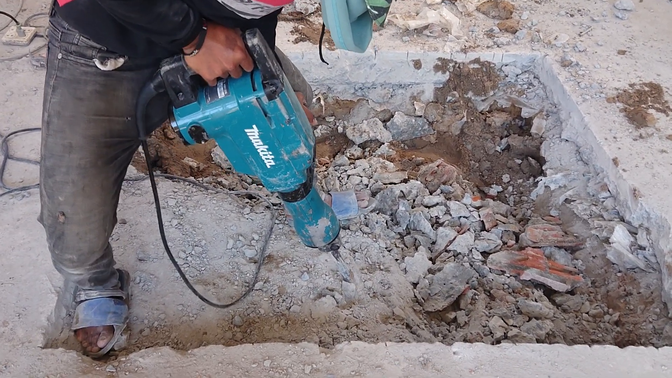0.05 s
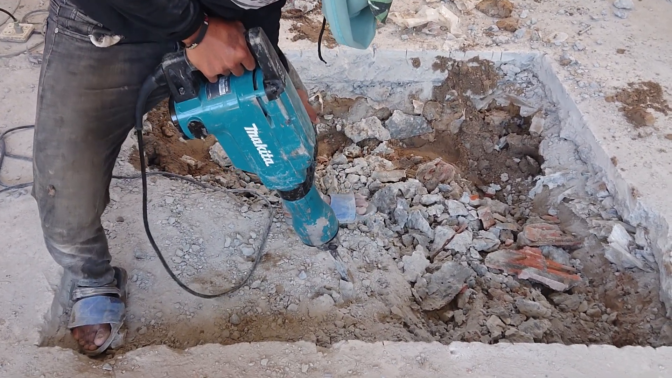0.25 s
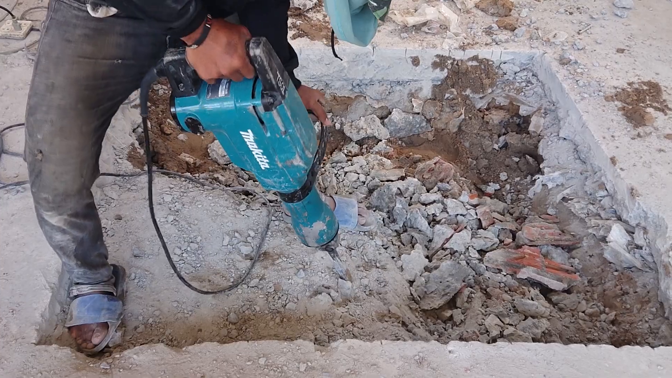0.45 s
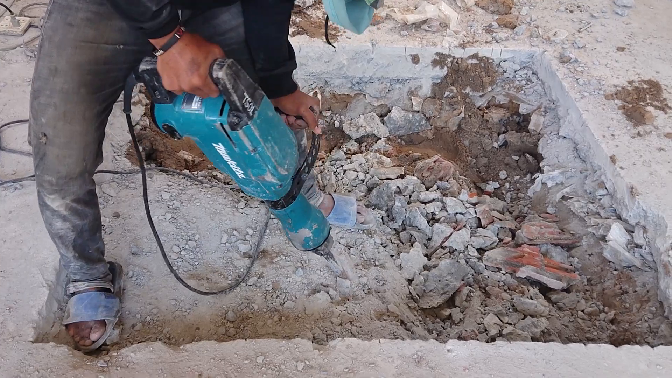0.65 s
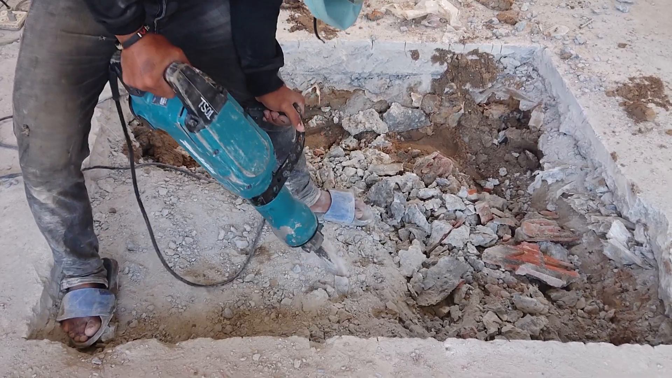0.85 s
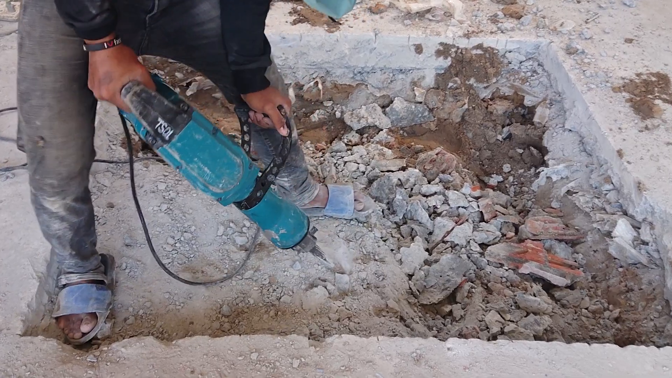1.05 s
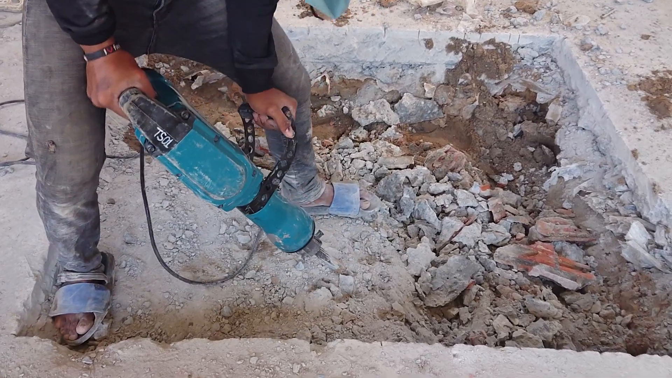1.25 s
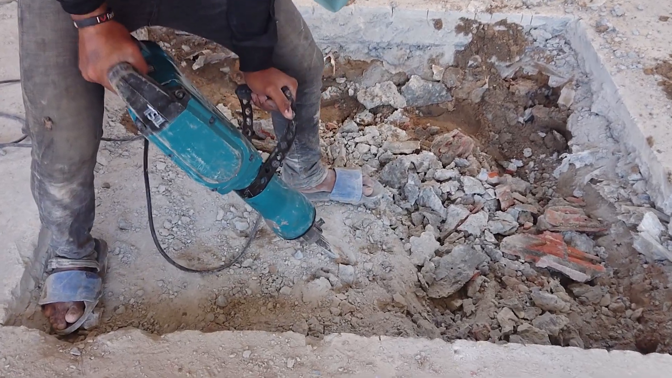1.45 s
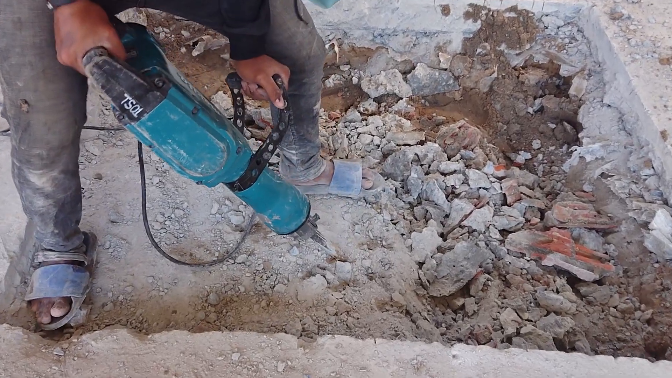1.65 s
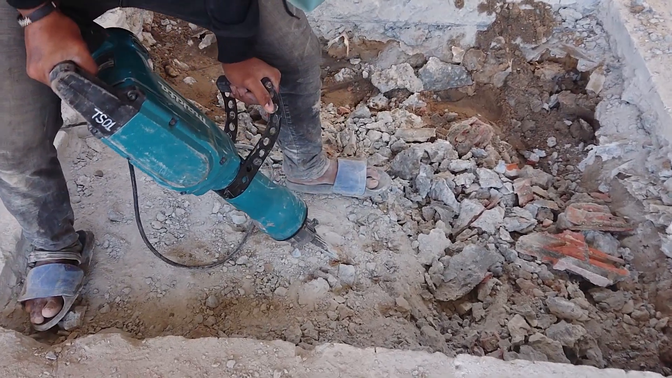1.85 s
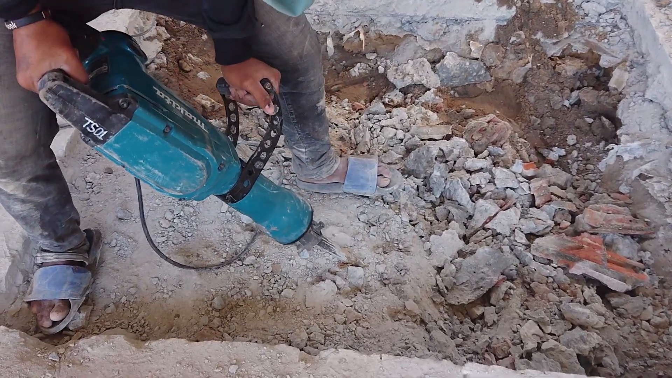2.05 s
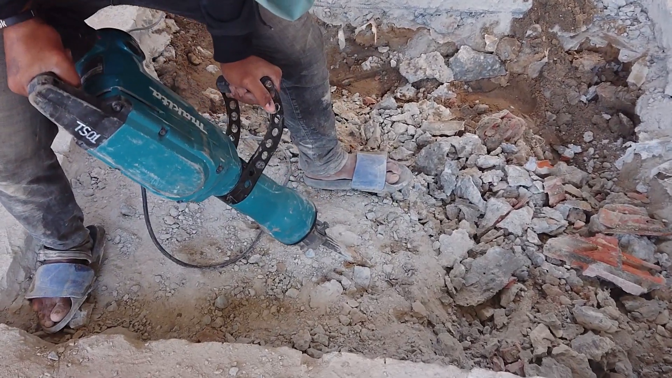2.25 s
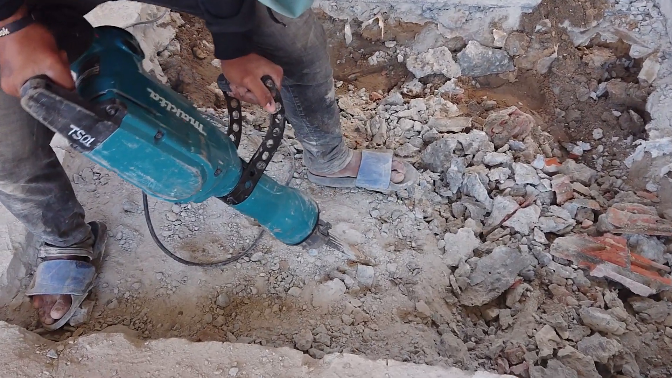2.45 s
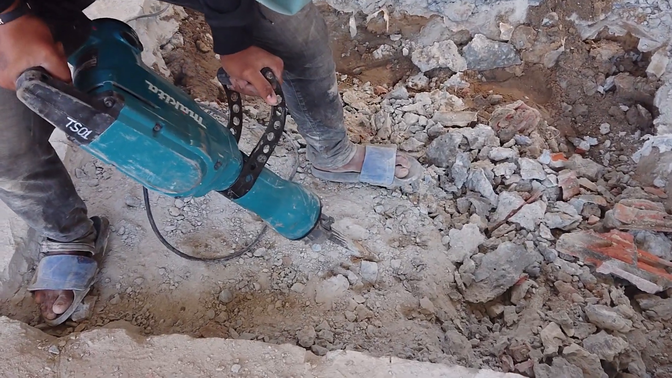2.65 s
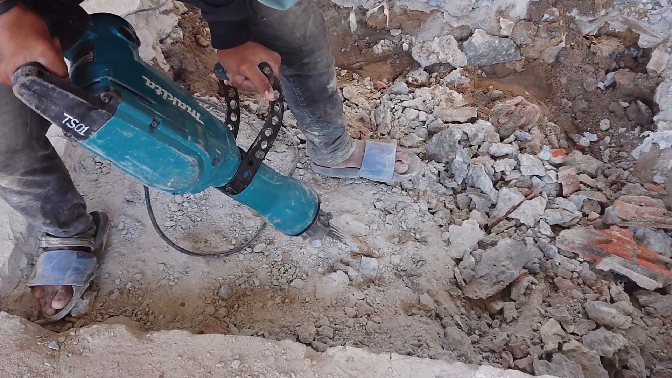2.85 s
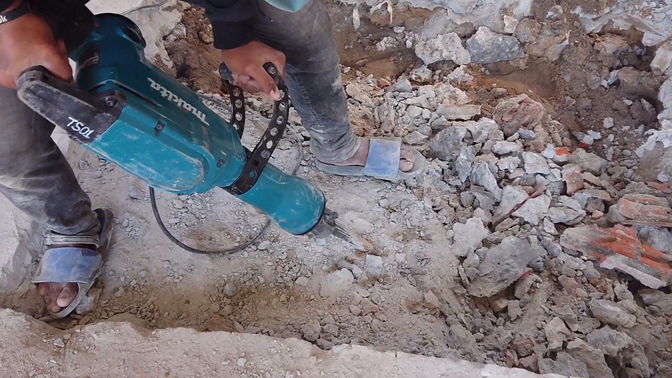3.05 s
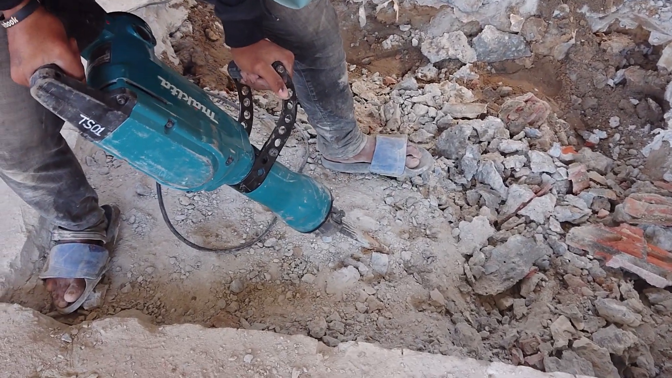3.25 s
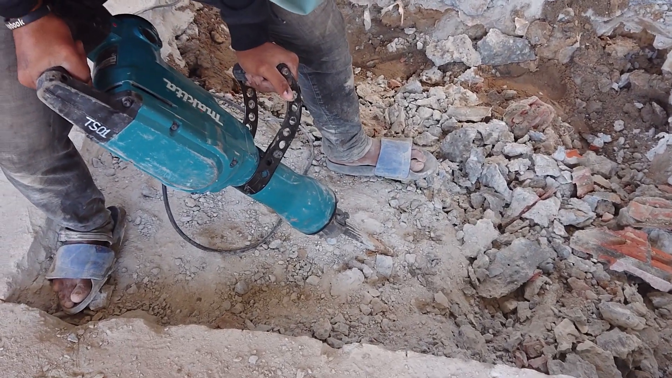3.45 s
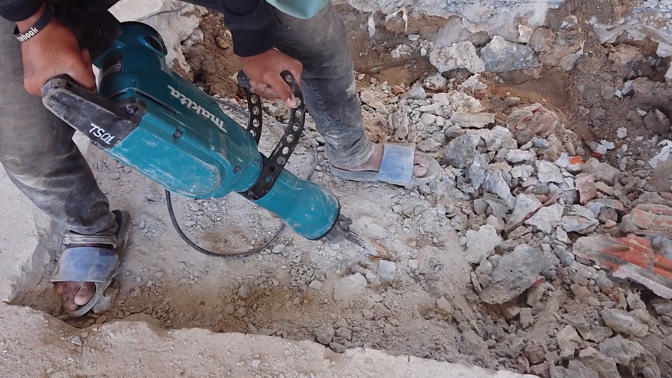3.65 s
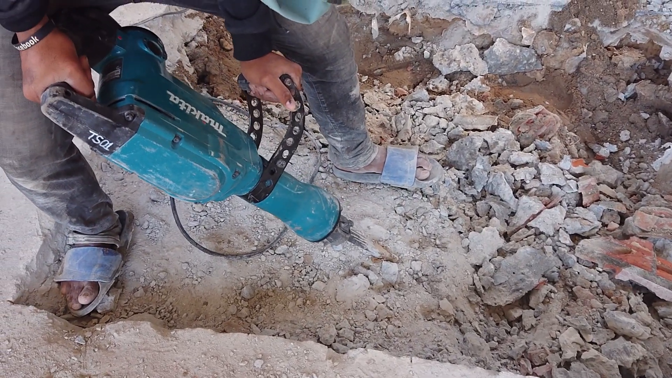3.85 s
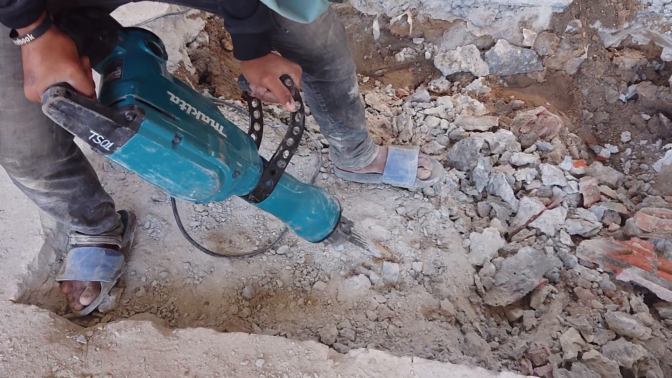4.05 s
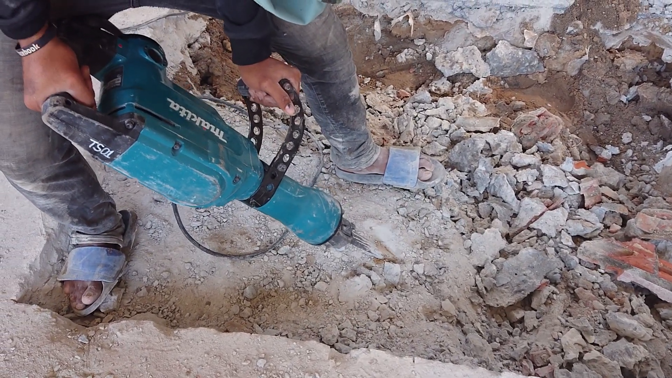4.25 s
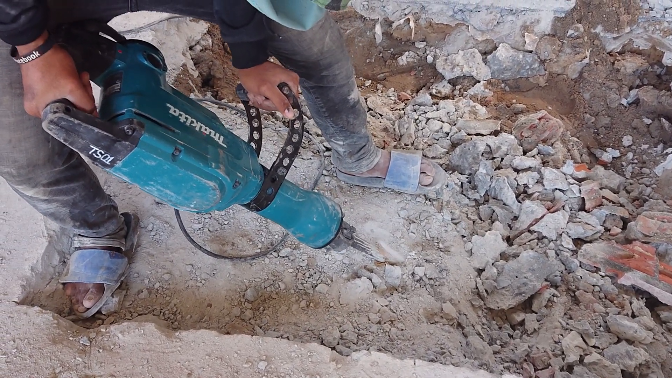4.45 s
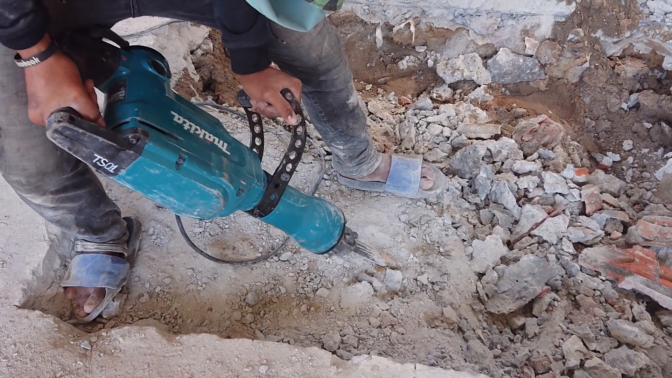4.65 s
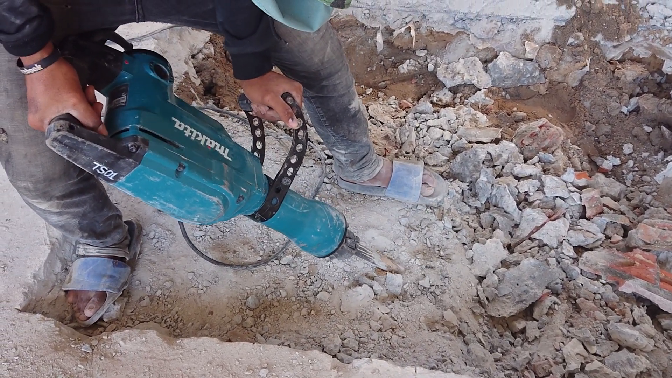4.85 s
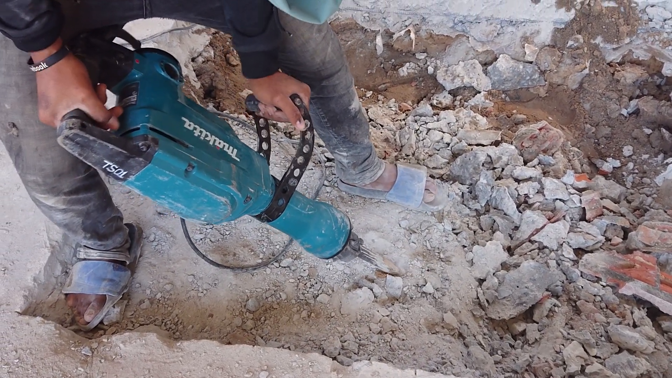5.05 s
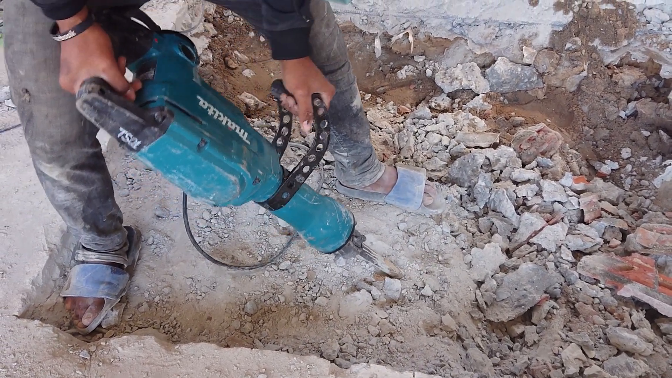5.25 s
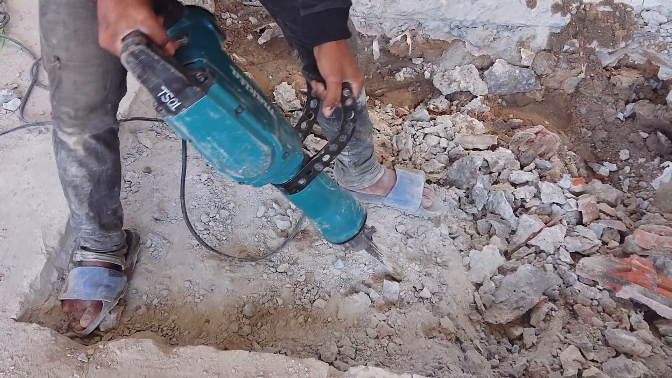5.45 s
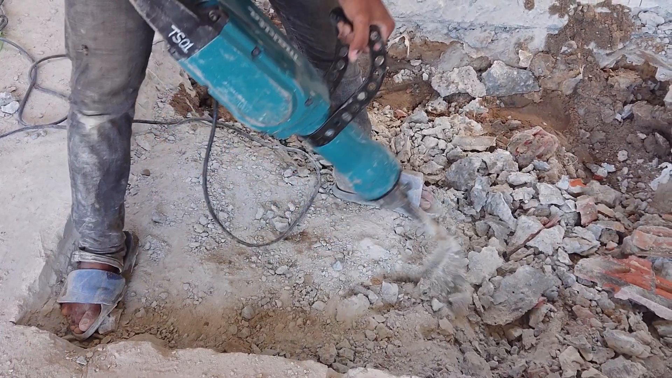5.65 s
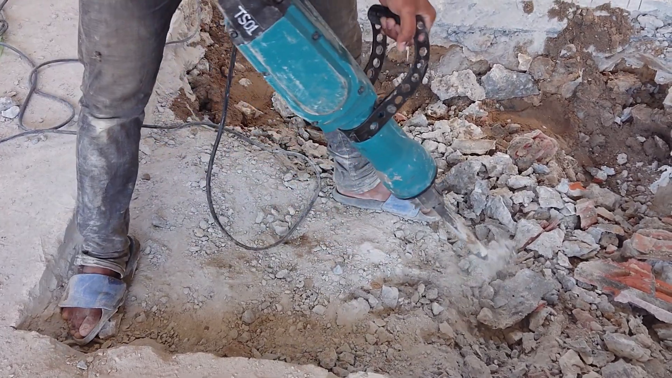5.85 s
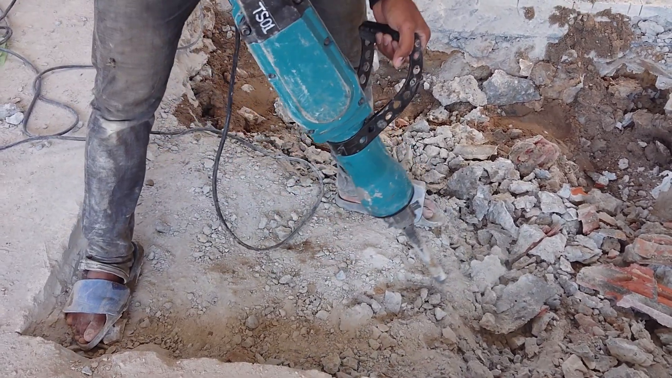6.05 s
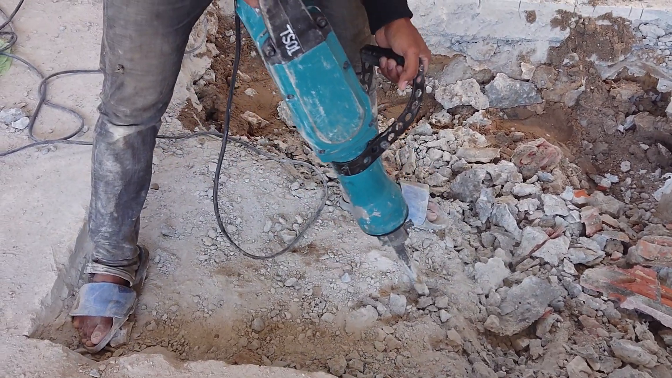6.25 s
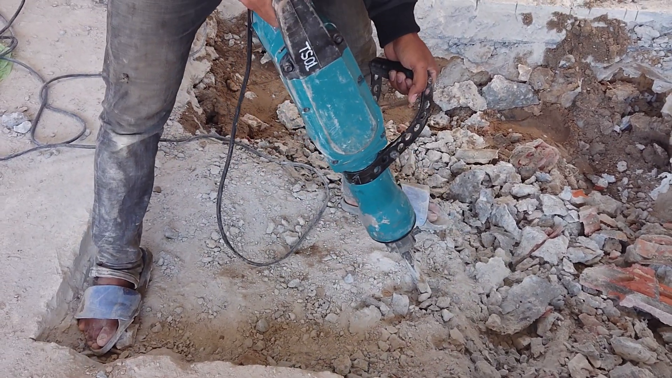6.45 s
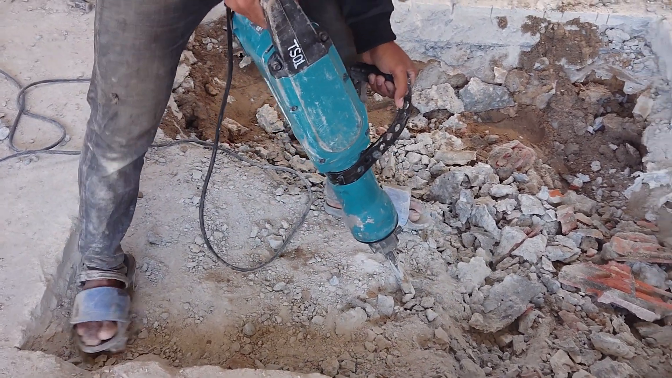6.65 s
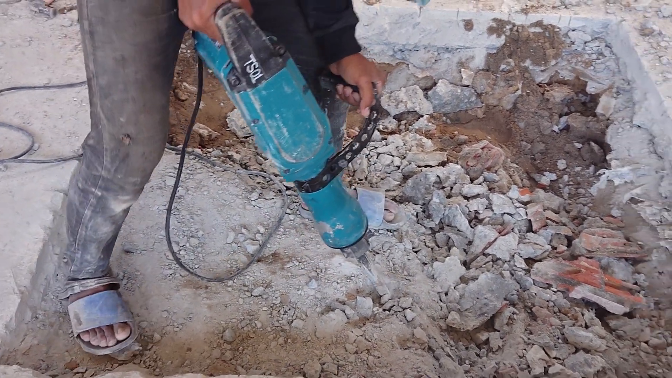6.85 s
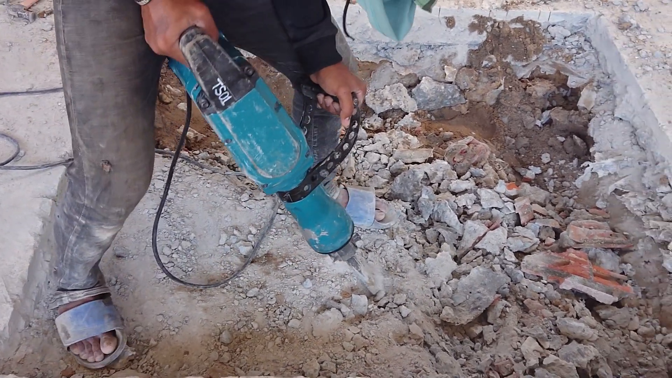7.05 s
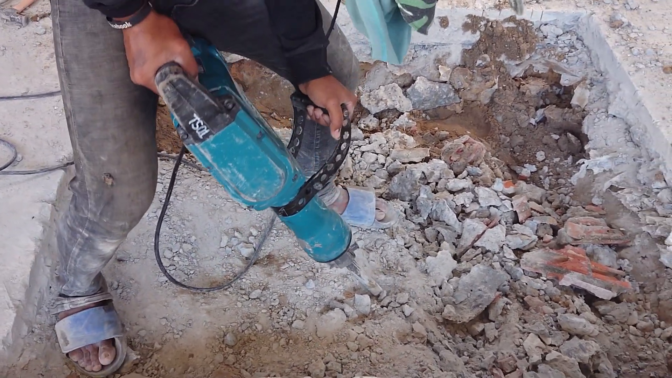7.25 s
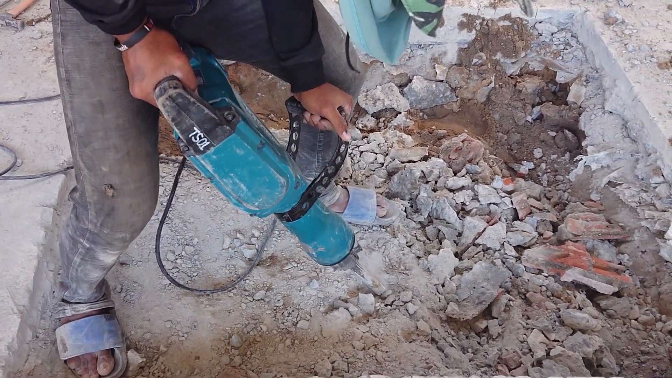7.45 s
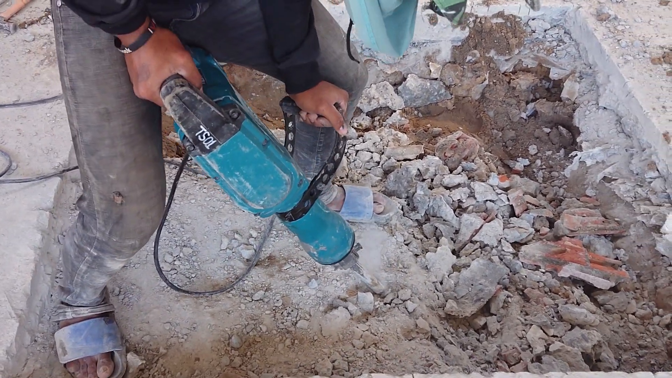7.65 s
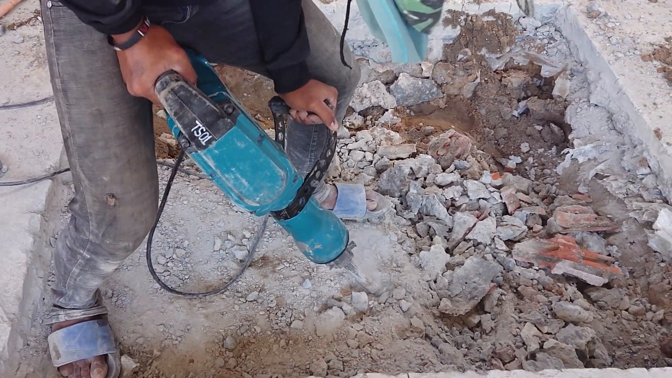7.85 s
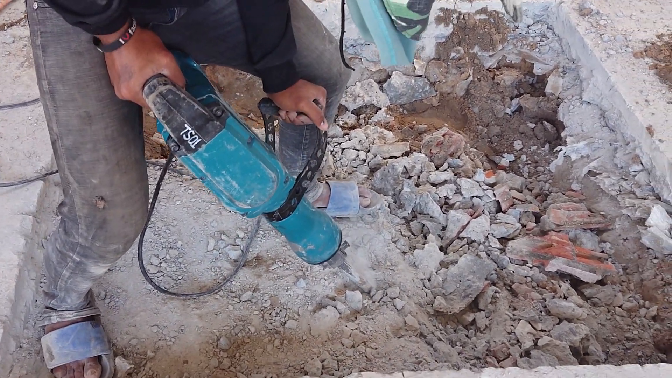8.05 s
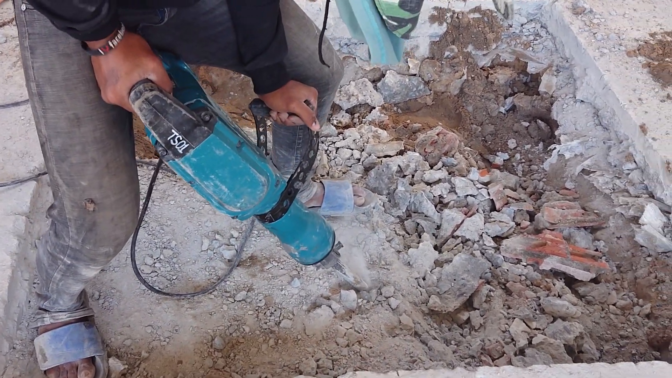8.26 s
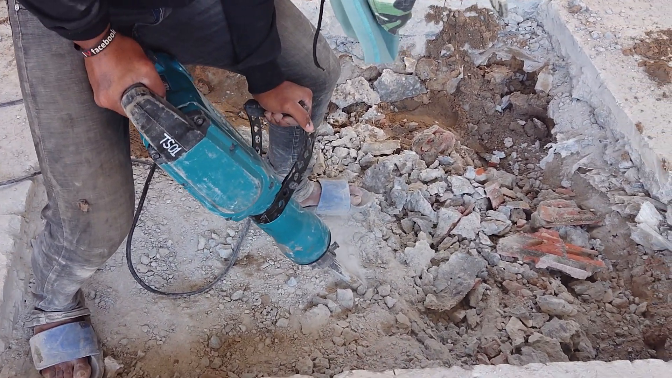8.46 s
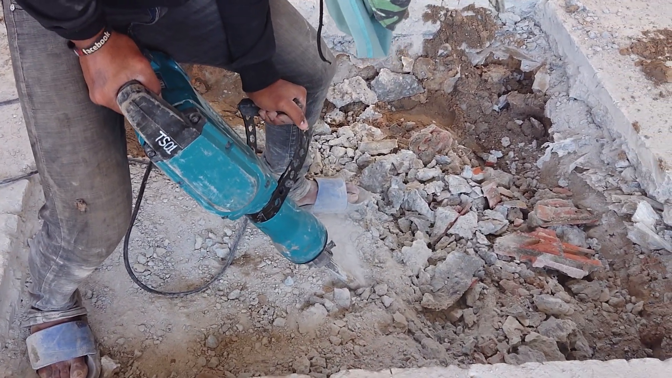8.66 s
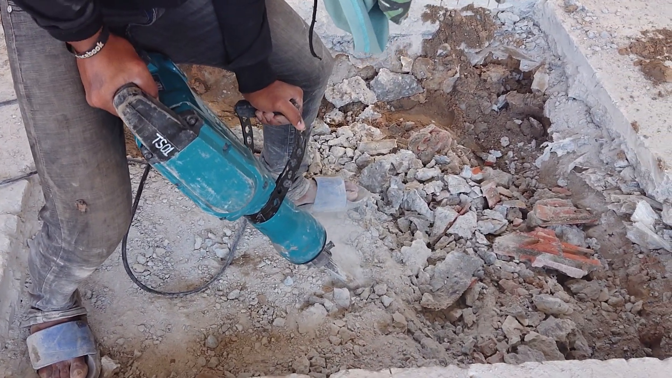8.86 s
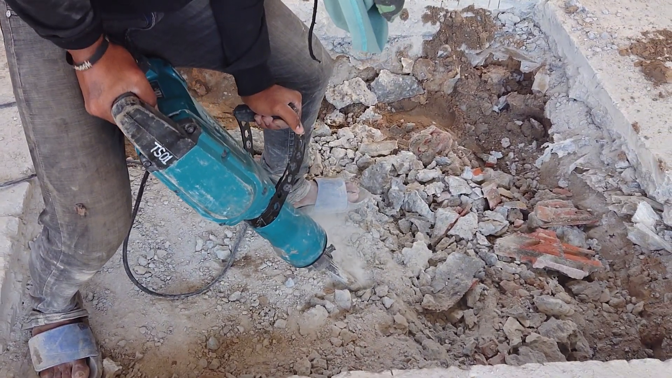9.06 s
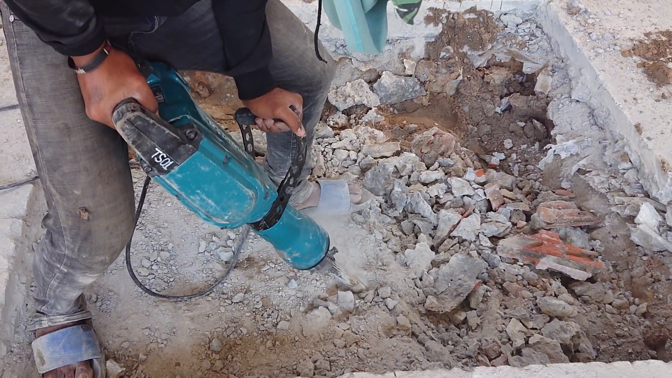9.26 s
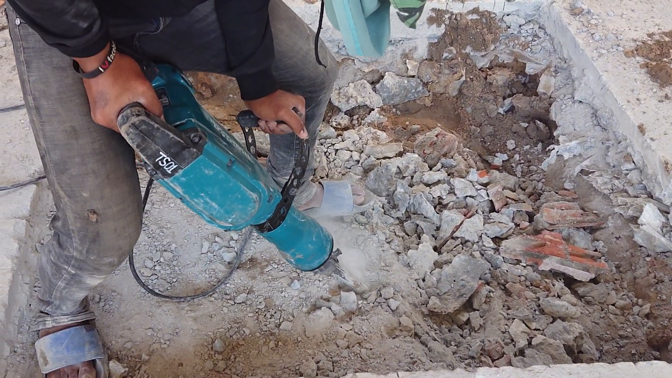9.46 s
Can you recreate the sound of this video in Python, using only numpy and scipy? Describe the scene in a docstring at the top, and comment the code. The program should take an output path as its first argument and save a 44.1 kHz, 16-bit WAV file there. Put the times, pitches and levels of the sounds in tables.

```python
"""An electric demolition hammer breaks concrete outdoors, close to a handheld pair of microphone ports.
About 22 blows a second: each is a noise crack, a damped slab knock, a clack and a ringing chisel.
Between blows, shaped noise makes gears and loose steel rattle; sines at crank multiples shake the casing.
The trigger is let go once: the blows slow down, steel clinks, then the motor growls up again."""
import sys
import numpy as np
from scipy import signal
from scipy.fft import rfft, irfft, next_fast_len
from scipy.io import wavfile
from scipy.ndimage import uniform_filter1d, map_coordinates

SR = 44100
rng = np.random.default_rng(int(sys.argv[2]) if len(sys.argv) > 2 else 0)


def store_pcm(level_fs):
    """Save levels as 16-bit WAV."""
    pcm = np.round(np.clip(level_fs, -1, 1) * 32767).astype(np.int16)
    wavfile.write(sys.argv[1], SR, np.atleast_2d(pcm).T)


N = 418950
T = np.arange(N) / SR  # s

# All levels are relative: each layer has further gains of its own.
# Place and microphone: likeness of the two ports [f/Hz, likeness 0 to 1]
PORT_LIKENESS = [(50, .8), (150, .9), (400, .85), (900, .7), (1800, .5), (5000, .5), (9000, .25)]
# Phase by which the left port leads [f/Hz, phase/rad]
LEFT_LEAD = [(0, 0), (1030, 0.5), (1980, 4.5), (2580, 6.5), (3700, 9.5), (4910, 13.5), (5680, 19),
             (7240, 25), (16000, 36.5)]
# Left port minus right port [f/Hz, level/dB]
LEFT_TILT = [(60, 1.5), (700, -2), (1300, -6), (2400, -3.5), (5000, -4), (9000, -4), (15000, 1)]
TOP_HZ = 16000  # band limit
PATCHY_DB = 2  # rms spread of the patches of gain in every hiss

# Casing: low drone that comes and goes [t/s, level/dB]
DRONE_LEVEL = [(4.55, -60), (4.6, -28), (4.68, -27), (4.73, -62), (4.8, -30), (4.95, -37), (5.05, -43),
               (5.2, -36), (5.43, -37), (5.7, -48), (6.0, -41), (6.15, -49), (6.22, -48)]
DRONE_HZ = 65.7
# Casing shake [multiple of the crank speed, level/dB]
SHAKE_ORDERS = [(1, -29), (2, -14), (3, -4), (4, -8), (5, -13), (6, -6), (7, -10), (8, 0), (9, -9),
                (10, -7), (11, -8), (12, -4), (13, -4), (14, -15), (15, -4), (16, -9), (17, -14)]
# Growl under the shake [f/Hz, level/dB per Hz]
GROWL_SPECTRUM = [(18, -62), (30, -52), (48, -7), (69, -7.5), (171, -3.5), (402, -9), (600, -8), (780, -18),
                  (1320, -120)]

# Running noise of the tool [t/s, gear level/dB, rattle level/dB, casing thrum level/dB]
TOOL_LEVELS = [(0, -23.5, -18.5, -34.5), (1, -20.5, -21, -30.5), (1.3, -23, -20, -34),
               (2.2, -21.5, -24, -34), (3.2, -21.5, -25.5, -33), (4.4, -20.5, -22, -31.5),
               (4.7, -22, -21.5, -38), (5.1, -25.5, -22.5, -34.5), (5.7, -39, -40.5, -43.5),
               (6.04, -48, -49.5, -48.5), (6.15, -39.5, -39.5, -46.5), (6.42, -49, -55.5, -48),
               (6.47, -37.5, -47, -44), (6.586, -52, -54, -50), (6.59, -35, -49, -26),
               (6.73, -29, -46, -34), (6.78, -25.5, -27, -33), (7, -23, -19, -33),
               (7.2, -27.5, -23.5, -36.5), (7.5, -25.5, -19.5, -35), (9.5, -24.5, -19.5, -33.5)]
# Gearbox resonances [f/Hz, level/dB per Hz]
GEAR_SPECTRUM = [(300, -21.5), (680, 0), (1100, -5), (1750, -0.5), (2020, -2), (2180, -3), (2420, -3),
                 (2690, -6), (2950, -6.5), (4000, -6.5), (6000, -84)]
# Narrow resonances of the gear housing [f/Hz, width/Hz, level/dB]
HOUSING_MODES = [(2180, 164, 0), (2664, 110, -1.5)]
# How much the housing rings over the gear noise [t/s, level/dB]
HOUSING_RING = [(0, -10), (1.7, -11), (2.2, -1.5), (4.5, -3.5), (5.9, -1), (6.2, -12.5), (7, -6),
                (9.5, -11)]
# Treble of struck steel, with two narrow peaks [f/Hz, level/dB per Hz]
SIZZLE_SPECTRUM = [(4600, -22), (7800, -8), (8300, -22), (8930, -46), (9400, -3), (12300, 0), (12590, 7),
                   (12900, 0), (14800, -5), (15350, -3), (15500, 9), (15650, -6), (16000, -14)]
SIZZLE_DB = -9  # treble of the rattle under its body

# Loose chisel and switch [t/s, contact level/dB, knock level/dB, ring level/dB], the last two re contact
CLINK_EVENTS = [(5.6, -19, -3, -15), (5.662, -23, -18, -17), (5.828, -19, -10, -23), (6.065, -23, -18, -11),
                (6.128, -20.5, -10, -15), (6.191, -36, -18, -6), (6.476, -38, -12, -23),
                (6.502, -33, 1, -25), (6.591, -41, 0, -25), (6.739, -15.5, -18, -30)]
# Modes of the chisel hanging free [f/Hz, level/dB, t60/s]
FREE_CHISEL = [(2230, -5, 0.37), (3300, -6.5, 0.33), (4600, -5, 0.36), (5240, 1, 0.63), (5720, -10, .3),
               (6000, -7, .3), (6470, -14, .2), (6860, -6, .35), (7770, -18, .3)]

# Crank, one blow a turn: hurries when the chisel slips, coasts, spins up again [t/s, turns made]
CRANK_TURNS = [(.006, 0), (.577, 13), (.983, 22), (1.122, 25), (1.255, 28), (1.416, 32), (1.545, 35),
               (1.901, 43), (2.52, 57), (3.134, 71), (3.663, 83), (4.112, 93), (4.344, 98), (5.071, 114),
               (5.125, 115), (5.185, 116), (5.26, 117), (5.347, 118), (5.455, 119), (6.786, 120),
               (6.854, 121), (6.905, 122), (7.003, 124), (7.457, 134), (7.946, 145), (8.249, 152),
               (9.47, 180)]
PACE = 22.7  # reference crank speed, turns/s
FLIGHT_S = .0012  # the piston lands this long after the crank comes round
JITTER_S = .0008  # rms scatter of the landing
CRACK_DB, CRACK_SCATTER_DB, KNOCK_SCATTER_DB = -9.5, 1.94, 1  # an ordinary blow and its rms scatter
# Blows that land harder or glance off [t/s, crack level/dB, slab knock level/dB]
UNUSUAL_BLOWS = [(.049, -17, -21.7), (.094, -12, -9.5), (.225, -9, -7), (.313, -8, -4), (.359, -14, -11.5),
                 (.401, -21, -5), (.533, -17, -6.5), (.577, -15, -10.5), (.622, -11.5, -7.5),
                 (.711, -9.5, -10), (1.027, -9, -13), (1.075, -9, -12), (1.166, -29, -33),
                 (1.212, -19, -20), (1.255, -13, -16), (1.295, -17, -14), (1.375, -8.5, -25),
                 (1.812, -6, -24), (1.856, -12, -14), (1.901, -7.5, -11.5), (2.52, -6, -10),
                 (2.567, -11, -12), (2.829, -14, -16), (2.957, -6.5, -28), (3.051, -12.5, -17),
                 (3.404, -11, -11), (3.753, -9.5, -6.5), (3.934, -12.5, -10.5), (4.112, -8.5, -7.5),
                 (4.249, -6.6, -12), (4.344, -4, -13), (4.435, -12, -8), (4.707, -12, -8.5),
                 (4.799, -11.5, -8), (4.843, -6, -13), (5.26, -10.5, -7), (5.347, -12, -18),
                 (5.455, -16, -17.5), (6.788, -10.5, -16.5), (6.854, -7.5, -14.5), (6.955, -10, -26),
                 (7.003, -12, -16), (7.047, -6.7, -10.5), (7.185, -30, -25), (7.231, -15, -22),
                 (7.277, -15, -25), (7.322, -10.5, -18), (7.366, -7, -13), (7.457, -8.5, -11),
                 (7.549, -8.5, -20), (7.636, -17, -16), (7.68, -7.5, -21), (7.946, -8, -20),
                 (8.076, -7, -14), (8.163, -7.5, -13.5), (8.249, -6, -21), (8.6, -11.5, -30),
                 (8.686, -9, -17), (8.816, -6.5, -14), (8.992, -11, -23), (9.338, -6.5, -19),
                 (9.47, -14, -16)]
# How the chisel sits in the slab
# [t/s, ring level/dB, knock level/dB, knock f/Hz, barrel clack level/dB, clack f/Hz]
CHISEL_SEAT = [(0, -32.5, -10.5, 790, -9, 4280), (.8, -26.5, -12.5, 845, -26, 3820),
               (1.27, -34, -21, 745, -13, 3140), (1.6, -24.5, -21, 950, -14, 3050),
               (2.0, -47, -11.5, 1097, -9, 2964), (4.1, -47, -12, 1110, -11.5, 3004),
               (4.45, -31, -11, 1100, -19, 3030), (4.6, -28.5, -9.5, 800, -22, 3170),
               (5.13, -31, -12, 780, -31, 3480), (5.26, -33, -16, 1070, -27, 3600),
               (5.46, -38.5, -14, 1070, -34, 4000), (6.8, -34, -19.5, 736, -1, 3175),
               (7.6, -37, -17, 774, -9.5, 4050), (9.5, -28.5, -19, 780, -5.5, 4090)]
# Modes of the chisel in the slab [f/Hz, level/dB, t60/s]
SEATED_CHISEL = [(2700, -5, .12), (4920, 0, .15), (5380, -4, .06), (5820, -1, .1), (6530, -8, .05),
                 (7480, -4, .2), (7590, -5, .2), (10720, -13, .12), (12585, -7, .2), (14010, -12, .12),
                 (15500, -4, .3)]
# Crack of the blow [f/Hz, level/dB per Hz]
CRACK_SPECTRUM = [(700, -73), (1400, 0), (2250, -6), (2800, -0.5), (3600, 1.5), (4500, -1), (4950, 5.5),
                  (5400, 6), (5800, 1.5), (6500, 2.5), (7450, -5.5), (8000, -11.5), (9000, -62)]
REBOUND_S, REBOUND_DB, REBOUND_SCATTER_DB = .012, -11, 4  # typical delay; level re crack; rms scatter


def amp(db):
    """Amplitude factor of a level in dB."""
    return 10 ** (np.asarray(db) / 20)


def unit(x):
    """The signal scaled to rms 1 over all its channels."""
    return x / np.sqrt(np.mean(x ** 2) + 1e-20)


def along(points, hz):
    """Values of (f/Hz, value) points, joined on a log frequency axis."""
    f, value = np.transpose(points)
    return np.interp(np.log(hz + 1), np.log(f + 1), value)


def curves(rows):
    """One value per sample for each column after the time."""
    s, *columns = np.transpose(rows)
    return [np.interp(T, s, column) for column in columns]


def wobble(rate):
    """A smooth random curve, rate knots a second."""
    knots = rng.standard_normal(int(N * rate / SR) + 4)
    return map_coordinates(knots, [T * rate])


def filtered(x, response):
    """The signal times a complex response of frequency."""
    m = next_fast_len(N + 8192)
    hz = np.fft.rfftfreq(m, 1 / SR)
    return irfft(rfft(x, m) * response(hz), m)[..., :N]


def hiss(spectrum):
    """Two unrelated shaped noises of joint rms 1, one per sound path, in shared patches of random gain."""
    z = signal.stft(rng.standard_normal((2, N)), nperseg=512)[2]
    field = uniform_filter1d(rng.standard_normal(z.shape[1:]), size=5, axis=0)  # across frequency
    field = uniform_filter1d(field, size=8, axis=1)  # across time
    pair = signal.istft(z * amp(PATCHY_DB * unit(field)), nperseg=512)[1][:, :N]
    return unit(filtered(pair, lambda hz: amp(along(spectrum, hz))))


def bursts(times, db, rise, t60):
    """An envelope that rises fast at each time and dies away exponentially."""
    t = np.arange(SR // 4) / SR
    marks = np.bincount((np.asarray(times) * SR).astype(int), amp(db), N)[:N]
    shape = (1 - np.exp(-t / rise)) * amp(-60 * t / t60)
    return np.abs(signal.fftconvolve(marks, shape)[:N])


def ring(times, db, modes, spread_db, detune):
    """Each contact rings decaying modes, newly tuned and weighted; a straight fade ends them in 1/6 s."""
    hz, level, t60 = np.transpose(modes)[:, :, None]
    out = np.zeros((2, N + SR))
    t = np.arange(SR // 6) / SR
    envelope = (1 - np.exp(-t / .001)) * (1 - t / t[-1])
    for s, hit_db in zip(times, db):
        luck = rng.standard_normal((4, len(modes), 1))
        # the last two rows give each path its own phase
        phase = 2 * np.pi * (hz * (1 + detune * luck[0]) * t + 2 * luck[2:])
        tones = amp(hit_db + level + spread_db * luck[1] - 60 * t / t60) * np.sin(phase)
        start = round(s * SR)
        out[:, start:start + len(t)] += tones.sum(axis=1) * envelope
    return out[:, :N]


def knocks(times, db, hz, t60):
    """A few heavily damped cycles, with a weaker mode 1.4 times higher."""
    out = np.zeros((2, N + SR))
    t = np.arange(SR // 30) / SR
    swell = (1 - np.exp(-t / .0007)) * amp([[0], [-4]])  # the second path is weaker
    for s, level, f in zip(times, db, hz):
        cycles = f * np.exp(.025 * rng.standard_normal((2, 2, 1))) * [[1], [1.4]] * t
        modes = amp([[0], [-4.5]]) * np.sin(2 * np.pi * cycles)
        start = round(s * SR)
        out[:, start:start + len(t)] += amp(level - 60 * t / t60) * swell * modes.sum(axis=1)
    return out[:, :N]


def casing():
    """The body shakes at multiples of the crank speed while it turns, over a growl and a low drone."""
    thrum_db = curves(TOOL_LEVELS)[2]
    # smoothed about the reference pace
    turns = uniform_filter1d(curves(CRANK_TURNS)[0] - T * PACE, size=9001) + T * PACE
    running = np.clip(np.gradient(turns) * SR / PACE, 0, 1) ** 3
    orders = np.zeros(N)
    for k, db in SHAKE_ORDERS:
        cycles = k * turns + rng.uniform() + .14 * wobble(5)
        orders += amp(db + 1.6 * wobble(2.44)) * np.sin(2 * np.pi * cycles)
    sounding = (T > DRONE_LEVEL[0][0]) & (T < DRONE_LEVEL[-1][0])
    tone = np.sqrt(2) * np.sin(2 * np.pi * (DRONE_HZ * T + .14 * wobble(7.1)))
    drone = sounding * amp(curves(DRONE_LEVEL)[0]) * tone
    # shake and drone take the first path only
    shake = unit(orders) * running * [[1], [0]] + amp(-1.5) * hiss(GROWL_SPECTRUM)
    return amp(thrum_db) * shake + drone * [[1], [0]]


def housing():
    """Noise that rings in the gear housing's narrow resonances, modelled as band-pass modes."""
    def peaks(f):
        return sum(amp(db) * 1j * f * width / (hz * hz - f * f + 1j * f * width)
                   for hz, width, db in HOUSING_MODES)
    return unit(filtered(rng.standard_normal((2, N)), peaks))


def rattle():
    """Gear noise with a ringing housing, and steel parts chattering in their guides at random moments."""
    gear_db, rattle_db, _ = curves(TOOL_LEVELS)
    ticks = rng.uniform(0, 1, (4000, 2))
    tick_bursts = bursts(ticks[:, 0] * T[-1], 10 * ticks[:, 1] - 13, rise=.0004, t60=.018)
    chatter = unit(.35 + tick_bursts)
    ringing = amp(curves(HOUSING_RING)[0]) * housing()
    gears = amp(gear_db + 1.72 * wobble(60)) * (amp(-3) * hiss(GEAR_SPECTRUM) + ringing)
    steel = hiss(CRACK_SPECTRUM) + amp(SIZZLE_DB) * hiss(SIZZLE_SPECTRUM)
    return gears + chatter * amp(rattle_db) * steel


def clinks():
    """Small contacts while the hammer is idle: a noise tick, a knock and the free chisel's modes."""
    s, db, knock_db, ring_db = np.transpose(CLINK_EVENTS)
    tick = bursts(s, db, rise=.0014, t60=.028) * hiss(CRACK_SPECTRUM)
    tones = ring(s, db + ring_db, FREE_CHISEL, spread_db=3, detune=.003)
    steel = amp(3 * wobble(90)) * tones  # the ring flutters
    knock = knocks(s, db + knock_db, np.full(len(s), 1100), t60=.025)
    return tick + steel + knock


def strikes():
    """Time, crack dB and knock dB of every blow: one a crank turn, scattered, the odd ones as listed."""
    when, turns = np.transpose(CRANK_TURNS)
    luck = rng.standard_normal((int(turns[-1]) + 1, 3))
    s = np.interp(np.arange(len(luck)), turns, when) + FLIGHT_S + JITTER_S * luck[:, 0]
    crack_db = CRACK_DB + CRACK_SCATTER_DB * luck[:, 1]
    knock_db = curves(CHISEL_SEAT)[1][(s * SR).astype(int)] + KNOCK_SCATTER_DB * luck[:, 2]
    rows = np.transpose([s, crack_db, knock_db])
    odd = np.array(UNUSUAL_BLOWS)
    nearest_turn = np.round(np.interp(odd[:, 0], when, turns)).astype(int)
    rows[nearest_turn] = odd
    return rows.T


def rebounds(s, crack_db):
    """The chisel springs back against the piston shortly after each blow, at a scattered delay and level."""
    luck = rng.standard_normal((len(s), 2))
    times = s + REBOUND_S * np.exp(.28 * luck[:, 0])
    db = crack_db + REBOUND_DB + REBOUND_SCATTER_DB * luck[:, 1]
    noise = amp(-18.5) * hiss(CRACK_SPECTRUM) + amp(-2) * housing()
    return bursts(times, db, rise=.0019, t60=.034) * noise


def blows():
    """Each blow cracks, rebounds, sizzles, rings the chisel, knocks the slab and clacks in the barrel."""
    s, crack_db, knock_db = strikes()
    seat = [column[(s * SR).astype(int)] for column in curves(CHISEL_SEAT)]
    ring_db, _, slab_hz, clack_db, clack_hz = seat
    snap = bursts(s, crack_db, rise=.0004, t60=.028)
    after = bursts(s, crack_db - 15, rise=.001, t60=.24)
    crack = (amp(-1.5) * snap + after) * hiss(CRACK_SPECTRUM)
    gear_jolt = amp(-7.5) * (snap + after) * hiss(GEAR_SPECTRUM)
    sizzle = amp(-11.5) * bursts(s, crack_db, rise=.0011, t60=.084) * hiss(SIZZLE_SPECTRUM)
    tones = ring(s, ring_db + 8, SEATED_CHISEL, spread_db=5.5, detune=.003)
    steel = amp(.35 * wobble(120)) * tones  # the tip keeps touching concrete, which roughens the ring
    knock = knocks(s + .001, knock_db + 7.5, slab_hz, t60=.0135)
    clack = knocks(s, clack_db + .6 * (crack_db + 8), clack_hz, t60=.03)
    return crack + gear_jolt + rebounds(s, crack_db) + sizzle + steel + knock + clack


def scene():
    """Two microphone ports share the bass; the treble reaches them by different paths."""
    def ports(hz):
        turn = np.arccos(np.clip(along(PORT_LIKENESS, hz), 0, 1)) / 2
        lead = np.interp(hz, *np.transpose(LEFT_LEAD))
        side = amp(along(LEFT_TILT, hz) / 2) * np.exp(.5j * lead)  # half to each port
        left = [np.cos(turn) * side, np.sin(turn) * side]
        right = [np.cos(turn) / side, -np.sin(turn) / side]
        return np.array([left, right])
    paths = casing() + rattle() + clinks() + blows()
    return filtered(paths, ports).sum(axis=1)


def record(dry):
    """Peaks clip softly at the microphone; nothing is kept above the band limit."""
    clipped = dry / (1 + np.abs(dry / .93) ** 6) ** (1 / 6)
    return filtered(clipped, lambda hz: hz < TOP_HZ)


dry = scene()
out = record(dry)
store_pcm(out)
```